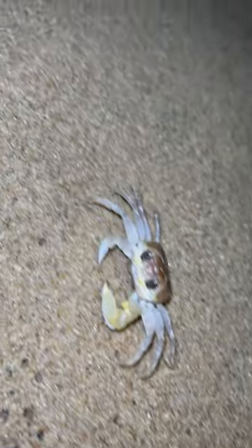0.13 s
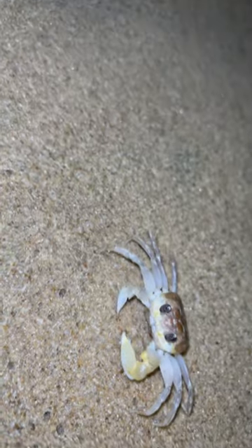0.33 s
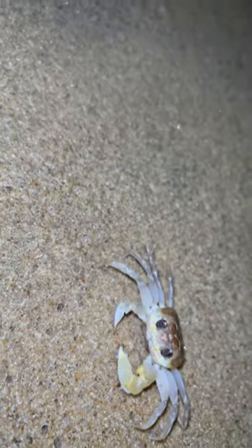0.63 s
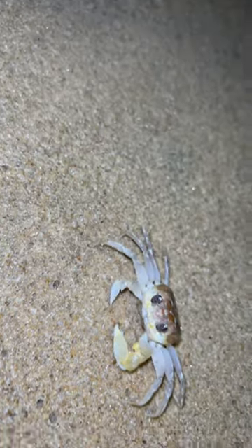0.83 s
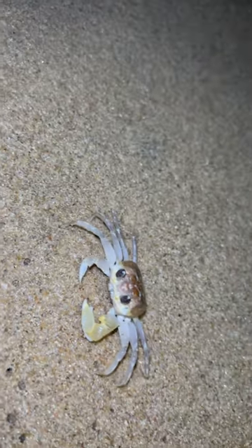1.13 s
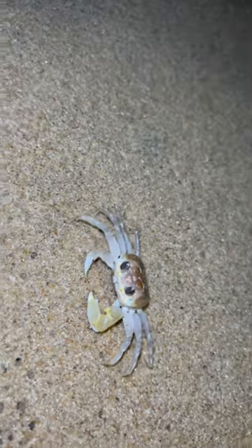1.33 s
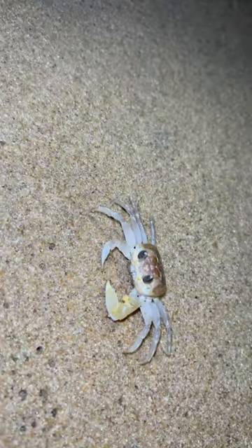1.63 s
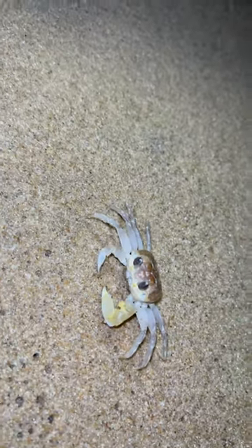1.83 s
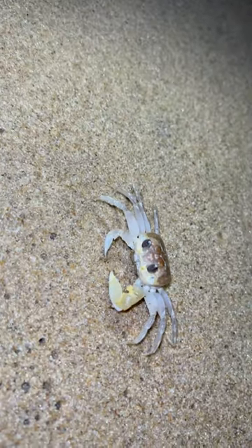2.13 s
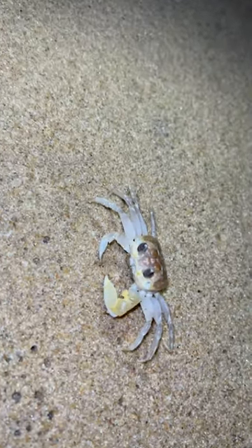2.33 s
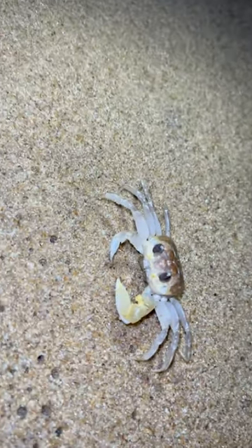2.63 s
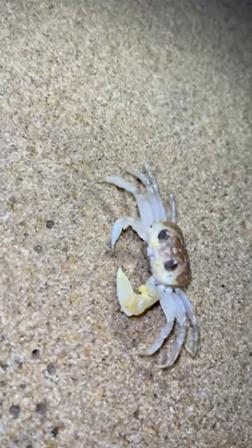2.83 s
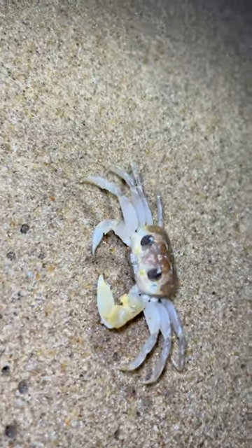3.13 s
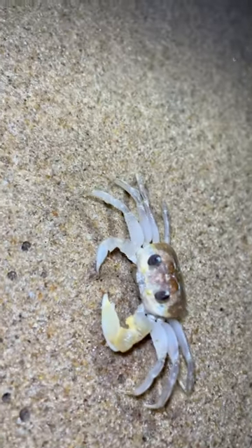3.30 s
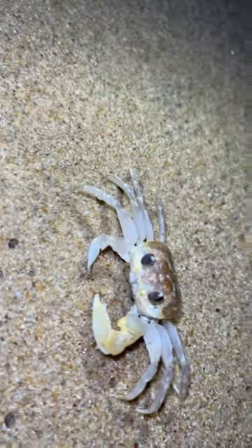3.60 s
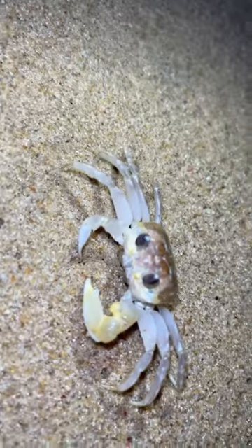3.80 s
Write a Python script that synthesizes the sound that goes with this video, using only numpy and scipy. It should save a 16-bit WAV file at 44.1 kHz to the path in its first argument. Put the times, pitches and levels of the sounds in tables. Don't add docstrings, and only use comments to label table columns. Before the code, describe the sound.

Night surf roaring steadily from distant breakers, with soft low thuds and light wind buffeting

```python
import sys
import numpy as np
from scipy import signal
from scipy.fft import rfft, irfft, next_fast_len
from scipy.io import wavfile
from scipy.ndimage import uniform_filter1d

SR = 44100
rng = np.random.default_rng(int(sys.argv[2]) if len(sys.argv) > 2 else 0)


def voltage_ratio(level):
    return 10 ** (np.asarray(level, float) / 20)


def transcribe(u):
    v = np.clip(np.atleast_2d(u).T, -1, 1)
    q = np.round(v * 32767).astype(np.int16)
    wavfile.write(sys.argv[1], SR, q)


N = 174636


def on_hz(table, hz):
    a = np.array(table, float)
    return np.interp(np.log(np.maximum(hz, 1)), np.log(a[:, 0]), a[:, 1])


def on_time(table):
    a = np.array(table, float)
    return np.interp(np.arange(N) / SR, a[:, 0], a[:, 1])


def walk(rate_hz):
    hold = int(SR / rate_hz)
    draws = rng.standard_normal(400)
    steps = draws[np.arange(N) // hold % len(draws)]
    return uniform_filter1d(uniform_filter1d(steps, hold), hold)


# f/Hz, left minus right level/dB
PORT_SHADING = [(60, 1.5), (130, -2.5), (360, -3.5), (640, -7), (1200, -3.5), (2100, 6), (4000, -4.5),
                (5600, -0.5)]


def water(spectrum, swell, alike, lag_s, turn_rad, patchy_db, flicker_db, count):
    top_hz = 15750
    size = next_fast_len(N)
    hz = np.arange(size // 2 + 1) * SR / size
    shared, own_left, own_right = rfft(rng.standard_normal((3, size)))
    likeness = np.clip(on_hz(alike, hz), 0, 1)
    common, own = np.sqrt(likeness), np.sqrt(1 - likeness)
    late = np.exp(1j * (turn_rad - 2 * np.pi * hz * lag_s))
    left = common * shared + own * own_left
    right = common * shared * late + own * own_right
    shade_db = on_hz(PORT_SHADING, hz) / 2
    level_db = on_hz(spectrum, hz) + np.array([shade_db, -shade_db])
    pair = np.array([left, right]) * voltage_ratio(level_db) * np.sqrt(SR / 2)
    lowest_hz = spectrum[0][0]
    pair = pair * (hz > lowest_hz / 2) * (hz < top_hz)
    half_octave = np.clip(2 * np.log2(np.maximum(hz, 1) / lowest_hz), 0, count - 1)
    out = 0
    for k in range(count):
        band = irfft(pair * np.clip(1 - abs(half_octave - k), 0, 1), size)[:, :N]
        out = out + band * voltage_ratio(patchy_db * walk(2.78) + flicker_db * walk(13.0))
    return out * voltage_ratio(on_time(swell))


# slow patches level/dB, quick flicker level/dB
UNEVEN = dict(rumble=(.4, .3), roar=(.3, .4), wave=(.5, .7), wash=(.5, 1.2), foam=(.4, 1.0))
# f/Hz, likeness/0-1
ROAR_ALIKE = [(40, 0.98), (130, 0.89), (230, 0.61), (350, 0.95), (500, 0.59), (800, 0.28)]
# f/Hz, level/dB per Hz
RUMBLE = [(25, -74.5), (45, -47), (70, -44.5), (130, -41.5), (190, -45), (260, -54.5), (330, -90.5)]
# t/s, level/dB
RUMBLE_SWELL = [(0, -5), (.5, -2.5), (1.0, -1), (1.5, -3), (2.0, 2), (2.3, -1), (2.7, -0.5), (3.3, 1.5),
                (3.96, 0)]


def rumble():
    return water(RUMBLE, RUMBLE_SWELL, ROAR_ALIKE, 0, 0.16, *UNEVEN["rumble"], count=8)


# f/Hz, level/dB per Hz
ROAR = [(150, -74.5), (240, -50.5), (340, -44.5), (450, -51), (600, -54), (900, -71.5), (1600, -102.5)]
# t/s, level/dB
ROAR_SWELL = [(0, -1.5), (.5, -1.2), (1.0, -1), (1.35, 1), (1.8, 1), (2.4, .5), (2.9, 0), (3.4, -.6),
              (3.96, .3)]


def roar():
    return water(ROAR, ROAR_SWELL, ROAR_ALIKE, -0.00061, -1.0, *UNEVEN["roar"], count=7)


# f/Hz, level/dB per Hz
WAVE = [(400, -61), (650, -53.5), (900, -59), (1200, -66), (1600, -74), (2200, -114)]
# t/s, level/dB
WAVE_SWELL = [(0, -7.5), (.8, -11.5), (1.3, -8.5), (1.9, -8.5), (2.4, -5), (2.9, -1), (3.3, 0.5),
              (3.96, -1)]


def near_wave():
    alike = [(600, 0.12), (900, 0.48), (1250, 0.68)]  # f/Hz, likeness/0-1
    return water(WAVE, WAVE_SWELL, alike, -0.00022, -3.1, *UNEVEN["wave"], count=6)


# f/Hz, level/dB per Hz
WASH = [(1000, -86), (1900, -80.5), (2600, -78.5), (3400, -78), (4400, -75.5), (5000, -82.5), (5600, -117),
        (6000, -115)]
# t/s, level/dB
WASH_SWELL = [(0, 0.98), (.25, -0.87), (.85, -0.6), (1.15, 1.9), (1.4, 1.3), (1.6, 0.069), (2.5, 0.22),
              (3.1, 0.36), (3.96, -0.91)]


def backwash():
    alike = [(2000, .25), (2500, 0.083), (3100, 0.33), (3700, 0.12), (4400, 0.33)]  # f/Hz, likeness/0-1
    return water(WASH, WASH_SWELL, alike, .0004, 4.9, *UNEVEN["wash"], count=6)


# f/Hz, level/dB per Hz
FOAM = [(4300, -97), (5100, -80), (6300, -81.5), (8000, -86.5), (9500, -87), (11500, -92), (13000, -97),
        (15700, -103)]
# t/s, level/dB
FOAM_SWELL = [(0, -1.7), (.6, -1.4), (1.2, -0.31), (2.0, -1.7), (2.4, 0.91), (3.2, 0.68), (3.96, 0.11)]


def foam():
    alike = [(5000, 0.68), (8000, 1.0), (14000, 0.66)]  # f/Hz, likeness/0-1
    return water(FOAM, FOAM_SWELL, alike, .0002326, -.58, *UNEVEN["foam"], count=5)


# f/Hz, level/dB per Hz
WIND = [(30, -62), (70, -42), (110, -45), (200, -51), (350, -50.5), (550, -57), (900, -80)]
# t/s, level/dB
GUSTS = [(0, -6), (.2, -6), (.32, -13), (.75, -6), (.95, -4), (1.05, -3.5), (1.27, -5), (1.45, -6),
         (1.9, -17), (2.15, -13), (2.4, -5.5), (2.6, -14), (3.05, -10), (3.5, -13), (3.96, -9)]


def wind():
    return water(WIND, GUSTS, [(100, .8), (400, .8)], 0, np.pi, .8, 3., count=10)


# t/s, peak level/dB, f/Hz, length/s
THUDS = [(.12, -21, 60, .06), (.28, -22, 72, .07), (.72, -21, 70, .06), (1.15, -22, 55, .07),
         (1.82, -17, 90, .06), (2.072, -14, 66, .1), (2.136, -16, 66, .045), (2.1785, -9.5, 68, .05),
         (2.308, -15, 64, .055), (2.385, -14, 62, .1), (2.88, -19, 58, .08), (3.22, -14, 70, .08),
         (3.31, -16, 55, .07), (3.43, -17, 60, .07), (3.74, -19, 75, .07)]


def thuds():
    lag_s = 0.0014
    t = np.arange(N) / SR + np.array([[-.5], [.5]]) * lag_s
    out = 0
    for at_s, peak_db, hz, length_s in THUDS:
        swell = np.exp(-((t - at_s) / (0.3 * length_s)) ** 2)
        out = out - voltage_ratio(peak_db) * swell * np.cos(2 * np.pi * hz * (t - at_s))
    return out * voltage_ratio(np.array([[.3], [-.3]]))


def scene():
    return rumble() + roar() + near_wave() + backwash() + foam() + wind() + thuds()


def starve(x, holes):
    hz, t, z = signal.stft(x, SR, nperseg=2048, noverlap=1536)
    blocks = len(t) // 4 + 1

    def held(v):
        return np.repeat(v, 4, axis=-1)[..., :len(t)]

    lines = held(np.repeat(rng.random((257, blocks)), 4, axis=0)[:len(hz)])
    for low_hz, high_hz, frame_share, line_share in holes:
        kept = (held(rng.random(blocks)) < frame_share) & (lines < line_share)
        outside = (hz < low_hz) | (hz >= high_hz)
        z = z * (kept | outside[:, None])
    return signal.istft(z, SR, nperseg=2048, noverlap=1536)[1][:N]


def band_limit(x):
    return signal.sosfilt(signal.butter(12, 15780, fs=SR, output="sos"), x)


# low f/Hz, high f/Hz, frames kept/0-1, lines kept/0-1
SUM_HOLES = [(5510, 5690, .75, .8), (5690, 6290, .07, .5), (6290, 6550, .8, .7), (6550, 6890, .97, 1),
             (9480, 9650, .85, .8), (9650, 10500, 0, 0), (10500, 10760, .06, .3), (10760, 11030, .25, .5),
             (13090, 13780, .99, .75), (13780, 14100, .03, .5), (14100, 17000, 0, 0)]
DIFF_HOLES = [(7300, 7580, .85, .8), (7580, 8270, 0, 0), (8270, 8620, .4, .4), (8620, 8960, .65, .6),
              (11500, 11710, .9, .8), (11710, 13090, 0, 0), (13090, 13440, .5, .5), (13440, 13780, .75, .7),
              (13780, 15160, 1, .85), (15160, 15760, .85, .7)]


def record(dry):
    mid = starve(dry[0] + dry[1], SUM_HOLES) / 2
    side = starve(dry[0] - dry[1], DIFF_HOLES) / 2
    return band_limit(np.array([mid + side, mid - side]))


dry = scene()
out = record(dry)
transcribe(out)
```